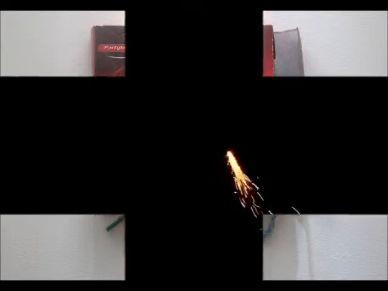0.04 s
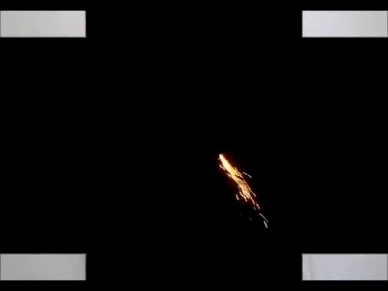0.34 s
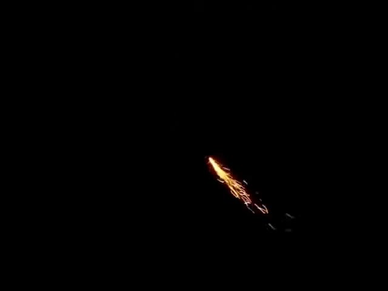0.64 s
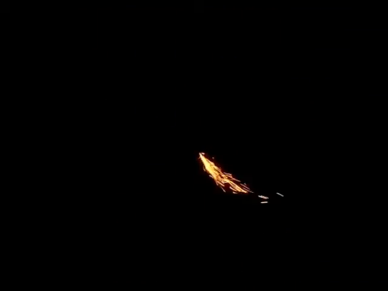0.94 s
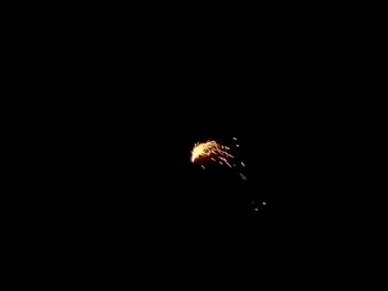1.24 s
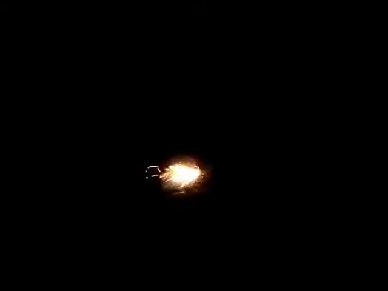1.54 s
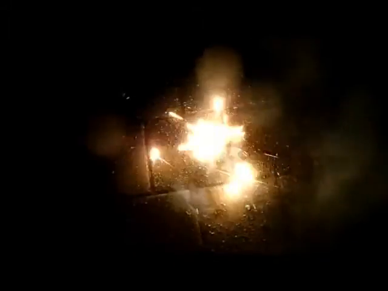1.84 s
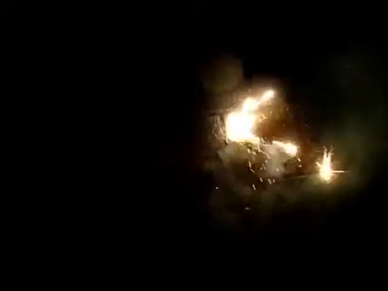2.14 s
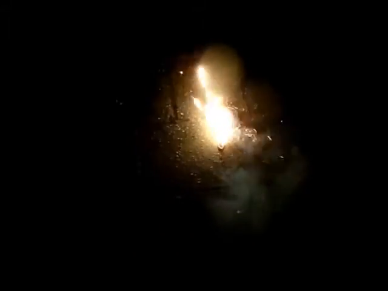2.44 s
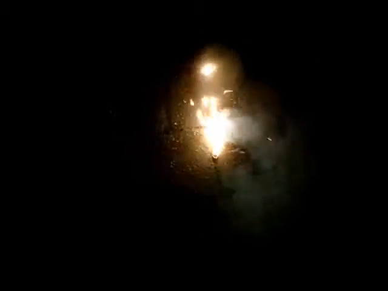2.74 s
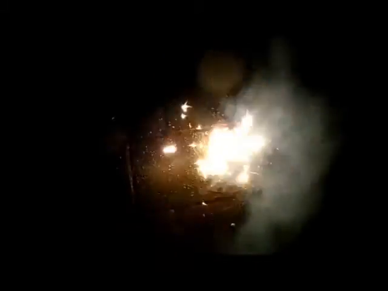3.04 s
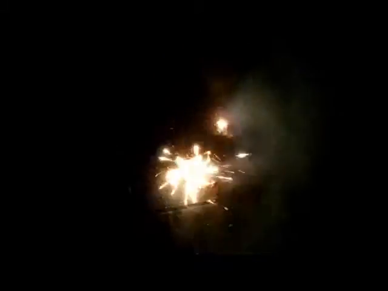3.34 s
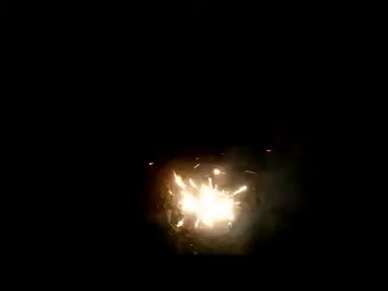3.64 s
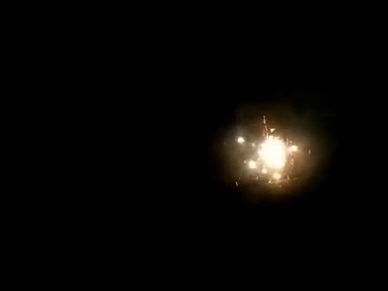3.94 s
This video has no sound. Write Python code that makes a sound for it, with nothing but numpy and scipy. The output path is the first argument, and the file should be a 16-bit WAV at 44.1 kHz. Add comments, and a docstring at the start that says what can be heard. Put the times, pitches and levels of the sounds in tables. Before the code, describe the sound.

Firework hissing outdoors: a fizzing fuse, a whoosh, a fluttering jet and a single pop.

```python
"""A small spinning firework on paving, over a low outdoor rumble. The fuse fizzes for a second and a half
while air bumps the microphone softly. The charge catches with a whoosh and burns as a fluttering jet of
gas and tiny bursting grains, with a breathy whistle. Just after three seconds one grain pops sharply.
Near the end the jet sputters, and the swinging nozzle makes the hiss swish against its own ground echo."""
import sys
import numpy as np
from scipy import signal
from scipy.fft import rfft, irfft
from scipy.io import wavfile

SR = 44100
rng = np.random.default_rng(int(sys.argv[2]) if len(sys.argv) > 2 else 0)


def inscribe(sig):
    """Save sig as 16-bit PCM at rate SR to the path in sys.argv[1].

    A 1-D sig is mono; a 2-D sig holds one channel per row.
    Samples are clipped to [-1, 1] before scaling.
    """
    pcm = np.round(np.clip(np.atleast_2d(sig).T, -1, 1) * 32767)
    wavfile.write(sys.argv[1], SR, pcm.astype(np.int16))


N = 176400
TIME_S = np.arange(N) / SR
TOP_HZ = 15750
# The flames are shaped on a grid of frequency bins and time frames.
HOP, WINDOW = 128, 512
HZ, FRAME_S = np.fft.rfftfreq(WINDOW, 1 / SR), np.arange(N // HOP + 3) * HOP / SR


def amp(db):
    """Decibels to gain."""
    return 10 ** (np.asarray(db) / 20)


def unit(x):
    """Scales to rms 1."""
    return x / np.sqrt(np.mean(x ** 2) + 1e-20)


def curve(table, s):
    """Every value column of a timed table, read at the times s."""
    times, *columns = np.transpose(table)
    return [np.interp(s, times, column) for column in columns]


def colour(spectrum, hz):
    """Gain of an EQ curve at hz."""
    points_hz, db = np.transpose(spectrum)
    return amp(np.interp(np.log(hz + 1), np.log(points_hz), db))


def add(mix, s, sound):
    """Mixes a sound in at time s."""
    part = mix[max(round(s * SR), 0):][:len(sound)]
    part += sound[:len(part)]


def outdoor_rumble():
    """A bed of low noise that swells briefly near the start."""
    # Tone of the rumble. Each row: frequency in Hz, relative level in dB.
    spectrum = [(15, -20), (35, -16), (70, -3.5), (110, -3.5), (210, 0), (320, -3), (450, -15.5),
                (1500, -27)]
    # Swell of the rumble. Each row: time in seconds, level in dB.
    levels = [(.35, -53.5), (.5, -46.5), (.65, -53), (3.4, -54.5), (4, -52.5)]
    noise = irfft(rfft(rng.standard_normal(N)) * colour(spectrum, np.fft.rfftfreq(N, 1 / SR)), N)
    return amp(*curve(levels, TIME_S)) * unit(noise)


def air_bump(db, hz, cycles=0.3):
    """A soft, quickly damped push of air whose envelope crests after the given cycles."""
    t = TIME_S[:SR // 10]
    age = t * hz / cycles
    return amp(db) * age * np.exp(1 - age) * np.sin(2 * np.pi * hz * t)


def comb(delay_s, strength):
    """The comb filter that a single echo makes, at constant power."""
    reflection = np.clip(strength, 0, .9)
    return (1 + reflection * np.exp(-2j * np.pi * HZ[:, None] * delay_s)) / np.sqrt(1 + reflection ** 2)


def paving_echo(strength=.31, full_hz=9000):
    """The ground echo hollows out the treble, sweeps as the flame moves and blurs as it spreads."""
    # Bounce off the paving. Each row: time in seconds, delay in milliseconds.
    delays = [(0, 1.07), (.45, 1.13), (.53, 1.02), (.62, 1.0), (.69, .885), (1.2, .8), (1.3, .672),
              (1.58, .655), (1.7, .81), (1.83, .925), (1.97, .932), (2.04, .88), (3.24, .86), (3.28, .74),
              (3.5, .665)]
    treble = np.minimum(HZ[:, None] / full_hz, 1)
    sharpness = np.interp(FRAME_S, [1.95, N / SR], [1, .5])
    return comb(curve(delays, FRAME_S)[0] / 1000, strength * sharpness * treble)


def flicker(rate_hz, width_hz, slowest_hz=6.8):
    """Random field (bins, frames) that moves at up to about rate_hz and is shared over width_hz."""
    noise = np.fft.fft2(rng.standard_normal((len(HZ), len(FRAME_S))))
    ripples_per_hz = np.fft.fftfreq(len(HZ), HZ[1])[:, None]
    motion_hz = np.fft.fftfreq(len(FRAME_S), HOP / SR)
    widths = np.exp(-(ripples_per_hz * width_hz) ** 2)
    rates = (1 - np.exp(-(motion_hz / slowest_hz) ** 2)) / (1 + (motion_hz / rate_hz) ** 2)
    return unit(np.fft.ifft2(noise * widths * rates).real)


def flutter(rate_hz, whole_db, patch_db, patch_hz):
    """Uneven burning, in dB: the whole flame flickers, and so do broad patches of its spectrum."""
    return whole_db * flicker(rate_hz, SR) + patch_db * flicker(rate_hz, patch_hz)


def burn(levels, spectrum, shape, sparks_per_s, spread_db, sparks_db, crossovers_hz=(2300, 8000)):
    """Rushing gas and tiny bursting grains, ridden in body, hiss and treble bands, with the ground echo."""
    size = (len(FRAME_S) - 1) * HOP
    grains = amp(spread_db * np.minimum(rng.exponential(1, size), 4)) * rng.choice([-1, 1], size)
    sparks = unit(grains * (rng.random(size) < sparks_per_s / SR))
    fizz = unit(rng.standard_normal(size) + amp(sparks_db) * sparks)
    frames = signal.stft(fizz, nperseg=WINDOW, noverlap=WINDOW - HOP)[2]
    body, below_treble = (1 / (1 + (HZ / edge) ** 10) for edge in crossovers_hz)
    bands = body, below_treble - body, 1 - below_treble
    tones = [unit(colour(spectrum, HZ) * np.sqrt(abs(band))) for band in bands]
    power = sum(np.outer(tone, amp(db)) ** 2 for tone, db in zip(tones, curve(levels, FRAME_S)))
    flame = frames * np.sqrt(power) * shape * paving_echo()
    return signal.istft(flame, nperseg=WINDOW, noverlap=WINDOW - HOP)[1][:N]


def fuse():
    """The fuse burns with a steady, finely spitting fizz."""
    # Ride of the fizz. Each row: time in seconds, then body, hiss and treble levels in dB.
    levels = [(0.0, -35.5, -29, -34.5), (0.26, -39, -31.5, -37.5), (0.5, -38.5, -31.3, -37.5),
              (0.68, -39, -29.5, -35.5), (0.88, -42, -34, -37), (0.95, -39.5, -31.0, -33.5),
              (1.2, -39, -31.0, -36), (1.245, -42, -36, -40.5), (1.31, -38.5, -30.5, -38.0),
              (1.5, -41.5, -32.5, -37)]
    # Tone of the fizz. Each row: frequency in Hz, relative level in dB.
    spectrum = [(100, -16.5), (430, -19), (800, -6.5), (1300, -6), (1900, -7.5), (2700, -3.5), (3850, 0.5),
                (4150, -6.5), (4450, -9.5), (4800, -1.5), (5350, 0.5), (6000, -3.5), (7200, -8.5),
                (8500, -17.5), (10500, -11), (11900, -12), (13500, -7), (15500, -18)]
    uneven = amp(flutter(rate_hz=36, whole_db=0.53, patch_db=0.78, patch_hz=3000))
    return burn(levels, spectrum, uneven, sparks_per_s=1500, spread_db=3.0, sparks_db=-5.5)


def grain_pop(swing_ms=0.29, tail_db=-33, tail_t60_s=0.22):
    """A grain bursts: one short pressure swing, a puff of gas, near echoes and a faint scattered tail."""
    # Slaps of the pop. Each row: delay in milliseconds, level in dB against the direct crack.
    echoes = [(.36, -26), (.85, -12), (2.4, -21), (14.6, -16)]
    t = TIME_S[:SR // 4]
    cycle = t * 1000 / swing_ms
    crack = -np.tanh(2 * np.sin(2 * np.pi * cycle)) * (cycle < 1)
    scatter = unit(signal.fftconvolve(rng.standard_normal(len(t)), crack)[:len(t)])
    pop = crack + amp(tail_db - 60 * t / tail_t60_s) * scatter
    add(pop, 0, air_bump(db=-21, hz=700, cycles=0.33))
    for delay_ms, db in echoes:
        add(pop, delay_ms / 1000, amp(db) * crack)
    return pop


def nozzle_swish():
    """The close echo of the swinging nozzle sweeps notches through the hiss."""
    # Swing of the nozzle. Each row: time in seconds, lowest notch in Hz, echo strength from 0 to 1.
    swings = [(1.59, 9100, 0), (1.615, 3780, 0.65), (1.65, 10200, 0.4), (1.73, 8700, 0.3),
              (1.85, 8300, 0.17), (2.93, 9000, 0.08), (2.985, 6300, 0.22), (3.05, 9000, 0),
              (3.36, 5100, 0.25), (3.44, 6540, 0.38), (3.505, 9500, 0.26), (3.53, 6000, .6),
              (3.57, 4330, 0.5), (3.605, 6200, 0.34), (3.655, 2960, 0.53), (3.73, 2760, 0.46),
              (3.78, 8040, 0.27), (3.825, 3120, 0.6), (3.88, 2900, 0.5), (3.94, 7700, 0.23), (4, 2870, 0.7)]
    notch_hz, strength = curve(swings, FRAME_S)
    blur = 1 / (1 + (HZ[:, None] / (4 * notch_hz)) ** 4)  # a wide flame blurs the higher notches
    return comb(.5 / notch_hz, strength * blur)


def jet(whistle_hz=5160, whistle_width_hz=220):
    """The charge catches, roars with a breathy whistle, then sputters and thins to a fine sizzle."""
    # Ride of the roar. Each row: time in seconds, then body, hiss and treble levels in dB.
    levels = [(1.5, -43.5, -34, -39), (1.578, -31.8, -20.5, -26), (1.607, -35.5, -25, -25),
              (1.66, -34.5, -26.3, -33), (1.695, -35, -25, -25.5), (1.735, -38.5, -29, -32),
              (1.785, -37.5, -29.3, -34.5), (1.82, -34.5, -26, -33.5), (1.895, -36.5, -26.5, -32.5),
              (2.0, -36, -27.5, -34.5), (2.3, -37.5, -28.5, -33.5), (2.5, -37, -27.5, -31.5),
              (2.78, -39.5, -29.5, -34), (2.85, -38.0, -27, -28.5), (2.91, -38.5, -30, -36),
              (2.96, -37.5, -28.5, -30.5), (2.99, -41.5, -34.5, -37), (3.02, -39.0, -27, -32),
              (3.12, -40, -33, -38), (3.16, -41, -28.5, -34), (3.225, -38, -29.5, -34.5),
              (3.25, -41, -31.5, -39.5), (3.375, -40, -31.5, -37), (3.49, -39.5, -29, -36),
              (3.565, -40.5, -32, -34), (3.605, -36, -26.5, -37), (3.65, -40, -31, -32.5),
              (3.8, -40, -33.5, -34), (3.84, -41.5, -33, -32.5), (3.96, -43.5, -35.5, -38),
              (4.0, -40.5, -33, -32.5)]
    # Tone of the roar. Each row: frequency in Hz, relative level in dB.
    spectrum = [(200, -24), (440, -22.5), (800, -11), (1300, -8), (2000, -9.5), (2700, -6.5), (3850, -2.5),
                (4230, -12), (4700, -8.5), (5150, -2), (5650, -5.5), (7200, -9.5), (8500, -16),
                (10800, -13), (13400, -9.5), (14400, -13), (15500, -18)]
    # Whistling resonance of the jet. Each row: time in seconds, boost in dB.
    resonance = [(1.55, 3.5), (1.72, 1.5), (1.85, 4.5), (2.5, 4.9), (3.25, 5.6), (3.45, 2.5), (4, 2)]
    treble = np.minimum(HZ[:, None] / TOP_HZ, 1)
    uneven_db = flutter(rate_hz=47, whole_db=0.33, patch_db=0.71, patch_hz=4500)
    sputter_db = flutter(rate_hz=260, whole_db=1.0, patch_db=1.5, patch_hz=4000) * np.sqrt(treble)
    sputter_db *= np.interp(FRAME_S, [2.82, 3.18], [1, 2.25])  # rougher from about three seconds
    sizzle_db = np.interp(FRAME_S, [3.3, N / SR], [0, 3.5]) * treble ** 6
    detuning = 2 * (HZ[:, None] - whistle_hz) / whistle_width_hz
    whistle_db = curve(resonance, FRAME_S)[0] / (1 + detuning ** 2)
    shape = amp(uneven_db + sputter_db + sizzle_db + whistle_db) * nozzle_swish()
    return burn(levels, spectrum, shape, sparks_per_s=2500, spread_db=2.0, sparks_db=-7.5)


def scene(catch_s=1.51, crossfade_s=0.033, pop_s=3.1688):
    """Over the rumble and air bumps, the fuse hands over to the jet and one grain pops."""
    # Air bumping the microphone. Each row: start in seconds, level in dB, pitch in Hz.
    bumps = [(.004, -25.5, 145), (.04, -42, 80), (0.134, -35.5, 179), (.16, -34, 150), (0.892, -31.5, 111)]
    lit = np.clip((TIME_S - catch_s) / crossfade_s + .5, 0, 1)
    mix = outdoor_rumble() + np.sqrt(1 - lit) * fuse() + np.sqrt(lit) * jet()
    add(mix, pop_s, amp(-3) * grain_pop())
    for start_s, db, hz in bumps:
        add(mix, start_s, air_bump(db, hz))
    return mix[None]


def record(dry):
    """A steep low-pass trims the very top of the hiss."""
    low_pass = signal.firwin(511, TOP_HZ, window=("kaiser", 9), fs=SR)
    return signal.oaconvolve(dry, low_pass[None], "same")


dry = scene()
out = record(dry)
inscribe(out)
```